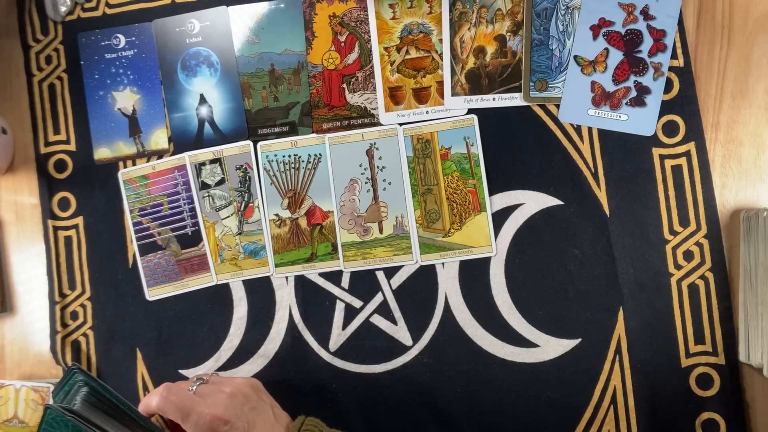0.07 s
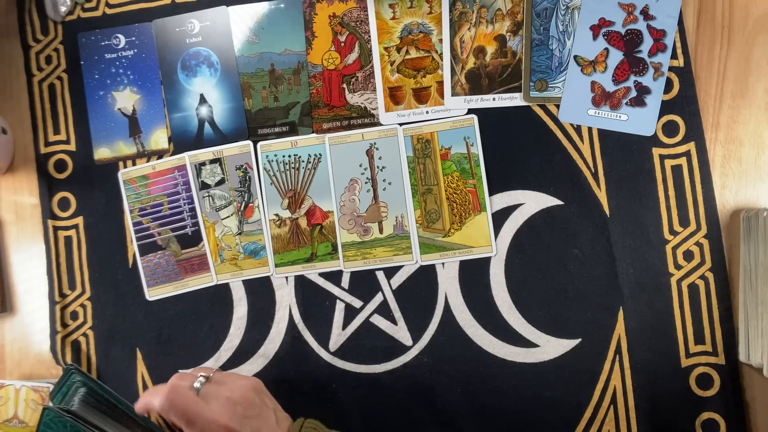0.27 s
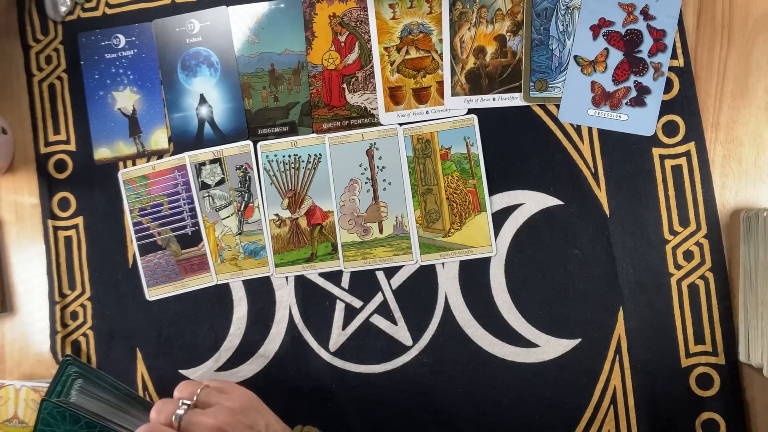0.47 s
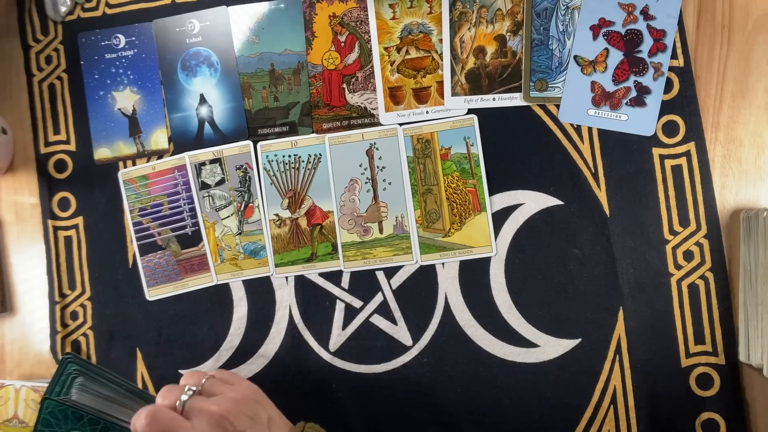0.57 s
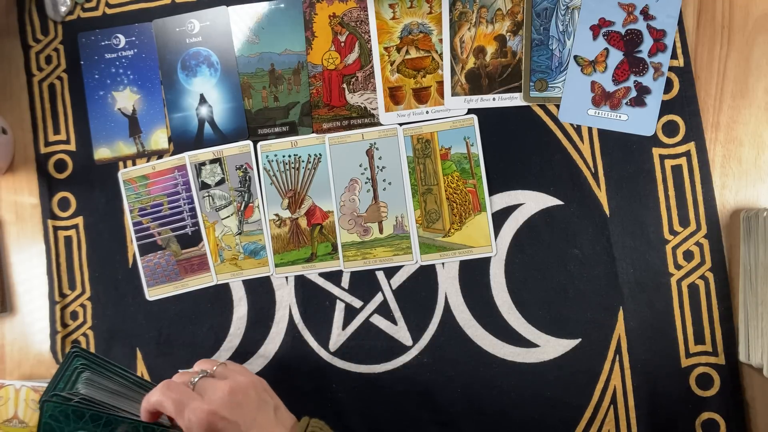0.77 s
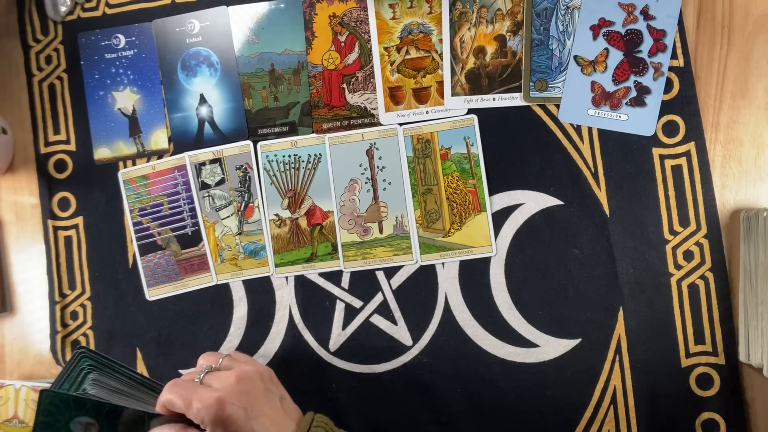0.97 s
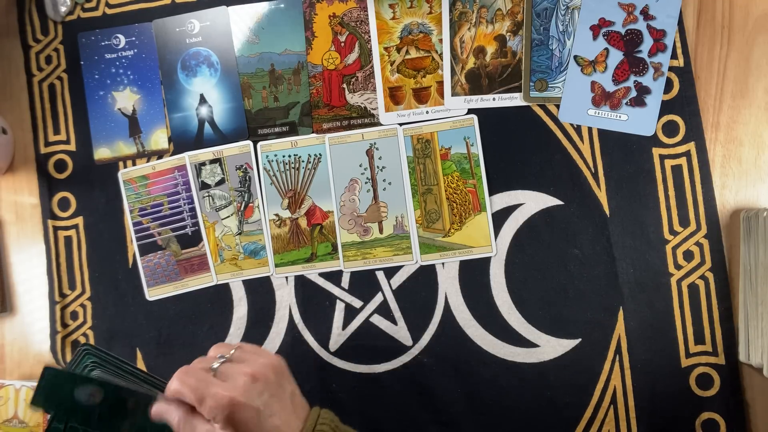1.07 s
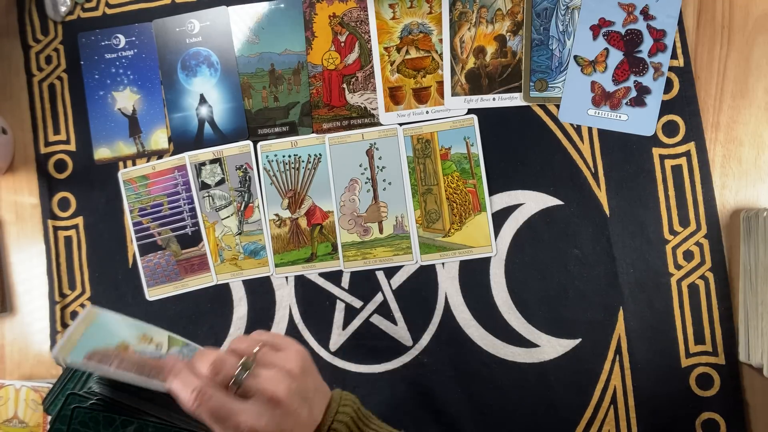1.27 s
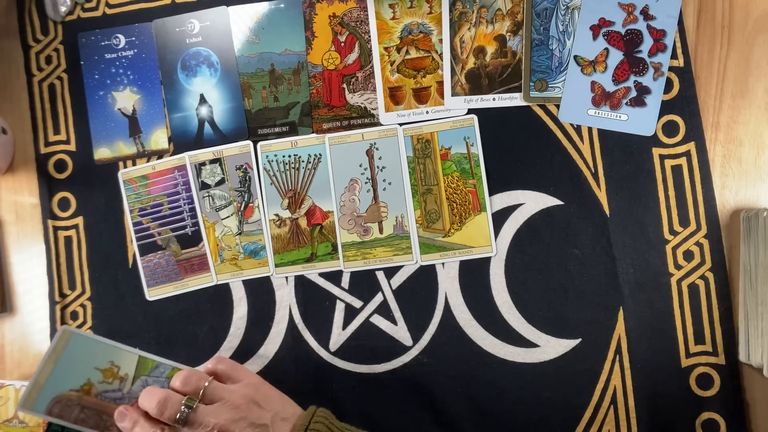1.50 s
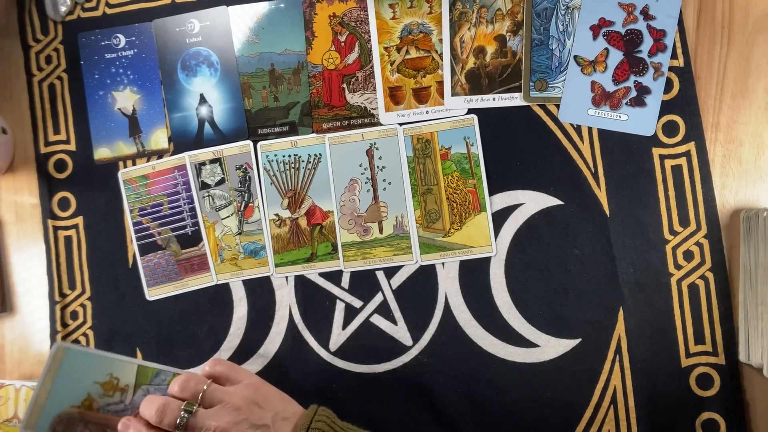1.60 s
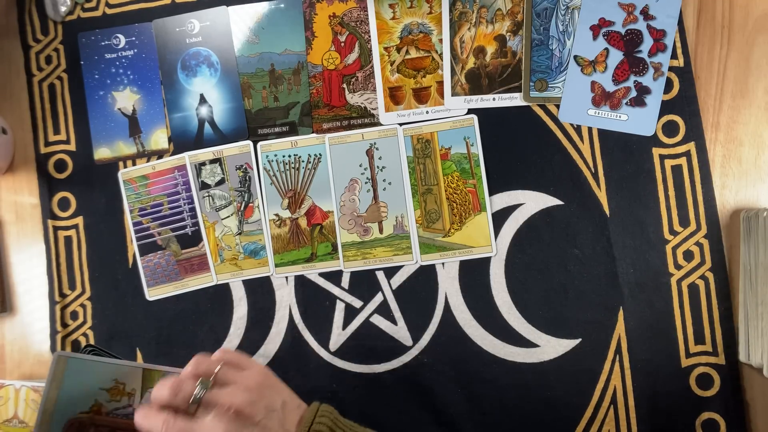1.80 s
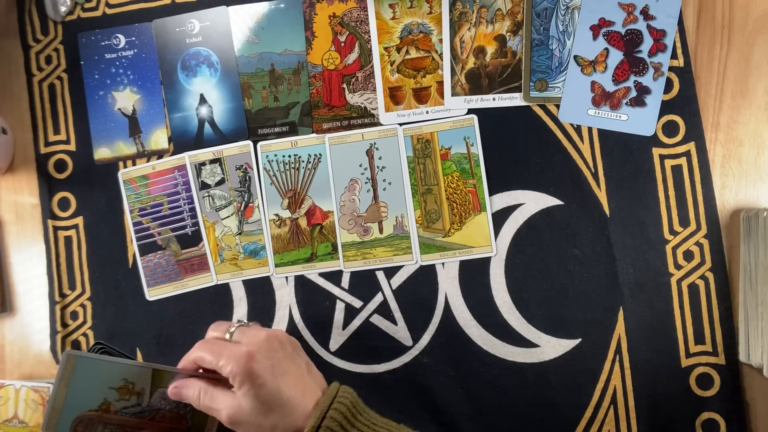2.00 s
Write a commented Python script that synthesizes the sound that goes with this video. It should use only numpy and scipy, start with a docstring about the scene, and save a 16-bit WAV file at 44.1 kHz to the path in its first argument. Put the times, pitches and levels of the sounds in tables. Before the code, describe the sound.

A tarot card is drawn from a hand-held deck. Faint rubbing and tiny ticks fill the first second, then the card slides, catches and comes free with a sharp snap at about 1.15 seconds. Two lighter clicks follow near 1.35 and 1.45 seconds as it is turned over. Card rubs softly on card until about 2 seconds. The small, quiet room rings briefly over a low rumble.

```python
"""Drawing a tarot card

A card slides out of a hand-held deck, catches, and snaps free over a cloth-covered table.
Two lighter clicks follow as it is turned over and a corner flicks past a finger.
Card rubs and ticks softly on card. A small, quiet room rings after each sound over a low rumble."""
import sys
import numpy as np
from scipy import signal
from scipy.fft import rfft, irfft
from scipy.io import wavfile

SR = 44100
rng = np.random.default_rng(int(sys.argv[2]) if len(sys.argv) > 2 else 0)


def generate_wav(sig):
    """Save sig (samples, or channels by samples) to the path in sys.argv[1] as 16-bit PCM at SR."""
    pcm = np.round(np.clip(np.atleast_2d(sig).T, -1, 1) * 32767).astype(np.int16)
    wavfile.write(sys.argv[1], SR, pcm)


N = 90316  # samples, about 2 seconds


def snap():
    """The card whips out, back and out: each blow slaps the air, rings the card and scrapes its edge."""
    # The blows. Each row: start in seconds, then slap, ring and scrape strength in dB.
    hits = [(1.15018, -33.5, -22, -17), (1.15091, -16.5, -40.5, -22), (1.15318, -5, -21.5, -12.5),
            (1.15472, -9, -52, -20), (1.15707, -39.5, -28, -28.5), (1.1627, -15, -39, -34.5)]
    # Tone of a slap. Each row: frequency in Hz, level in dB.
    slap_tone = [(20, -11), (45, -2), (100, -4), (320, -8), (580, -1.5), (1150, -2), (1900, 1),
                 (2400, -37.5), (3100, -11), (6000, -44), (16000, -57)]
    # Notes of the bending card. Each row: pitch in Hz, level in dB, fade time in seconds.
    card_notes = [(563, -9.5, 0.021), (904, -22.5, 0.12), (1174, -6, 0.021), (1697, -5.5, 0.045),
                  (1656, -7, 0.04), (2833, -23.5, 0.022), (3572, -19.5, 0.032), (4140, -29.5, 0.05)]
    # Tone of the edge scraping off the deck. Each row: frequency in Hz, level in dB.
    scrape_tone = [(300, -25), (2400, -11.5), (3400, -0.5), (5000, 5), (8000, -4), (10200, -4),
                   (11500, -15), (16000, -16.5)]
    starts, slap_db, ring_db, scrape_db = np.array(hits).T
    swing = (-1) ** (np.arange(len(starts)) // 2)  # the direction flips every two blows
    slaps = convolve(blows(starts, slap_db, swing), pulse(slap_tone))
    rings = convolve(blows(starts, ring_db, swing), ring(card_notes))
    scrape = sum(undb(db - 22) * decay(start, fade_s=0.0089) for start, db in zip(starts, scrape_db))
    return slaps + rings + burst(scrape, scrape_tone)


def clicks():
    """A corner flicks past a finger: a tick, a short ring that depends on the grip, a soft thud."""
    # Each row: start in seconds, tick level in dB, thud strength in dB.
    flicks = [(1.3485, -26, -19.5), (1.4666, -21.5, -35)]
    # Notes of the held card. Each row: pitch in Hz, fade time in seconds, dB in click one, dB in click two.
    held_notes = [(466, 0.077, -50.5, -58.5), (730, 0.015, -40, -70), (1079, 0.065, -47, -49.5),
                  (1325, .016, -36.5, -39), (1940, 0.015, -61, -36.5), (2736, 0.023, -87, -48.5),
                  (3110, 0.019, -53, -43), (3860, 0.029, -59, -42.5), (4100, 0.024, -54, -48.5),
                  (4660, 0.0092, -41.5, -39.5), (6880, 0.0093, -50.5, -57)]
    # Tone of a dry tick. Each row: frequency in Hz, level in dB.
    tick_tone = [(100, -15), (700, 9.5), (1600, -4), (2400, -8), (3300, 9.5), (5000, 6.5), (7000, 0.5),
                 (9000, -4.5), (13000, -9), (16000, -24)]
    thud = ring([(254, -30, 0.066), (80, -36, 0.05)])
    sound = 0
    for click, (start, tick_db, thud_db) in enumerate(flicks):
        notes = [(hz, levels[click], fade_s) for hz, fade_s, *levels in held_notes]
        card = ring(notes[::2]) - ring(notes[1::2])  # neighbouring notes bend it opposite ways
        tick = convolve(blows([start], tick_db), pulse(tick_tone))
        sound = sound + tick + convolve(blows([start], 0), card + undb(thud_db) * thud)
    return sound


def catches():
    """Card edges catch for a moment and fingertips nudge the deck."""
    # Each row: start in seconds, bright edge level in dB, dull fingertip level in dB.
    snags = [(0.349, -86, -61), (0.357, -72, -72), (0.393, -64, -81), (.484, -70, -65), (.621, -71.5, -67),
             (0.954, -69, -62), (0.963, -70, -64.5), (1.1274, -46, -48), (1.1347, -35, -45.5),
             (1.1395, -38, -37), (1.407, -62, -64), (1.4427, -52.5, -64), (1.881, -60, -60.5),
             (1.893, -58.5, -57.5)]
    # Tones of an edge and of a fingertip. Each row: frequency in Hz, level in dB.
    edge_tone = [(300, -22), (2400, -12.5), (3400, -2), (4400, 2.5), (6000, -10.5), (8000, -5),
                 (11000, -29), (16000, -29)]
    finger_tone = [(60, -1.5), (300, 1), (700, -1.5), (1400, -0.5), (1900, -4.5), (2500, -16.5),
                   (8000, -43), (16000, -58)]
    bright = sum(undb(db) * decay(start, fade_s=0.0097) for start, db, _ in snags)
    dull = sum(undb(db) * decay(start, fade_s=0.03) for start, _, db in snags)
    return burst(bright, edge_tone) + burst(dull, finger_tone)


def rubs():
    """Paper fibres stick and slip in thousands of tiny jolts that hiss and make the deck sound."""
    # Card sliding on card. Each row: peak, rise and fall times in seconds, hiss and deck levels in dB.
    slides = [(.266, 0.011, 0.023, -81.5, -84), (0.388, 0.046, 0.095, -78, -77),
              (0.594, 0.096, 0.077, -86, -85), (.80, 0.085, .08, -84, -82.5),
              (.898, .02, 0.058, -79.5, -70), (1.137, 0.15, 0.03, -62, -70.5), (1.45, 0.12, 0.19, -81, -74),
              (1.632, 0.097, 0.038, -67.5, -81.5), (1.71, 0.069, 0.069, -85, -77.5),
              (1.836, 0.082, 0.071, -72.5, -71), (2.011, 0.17, 0.12, -92.5, -73)]
    # Tones of the paper's hiss and of the deck. Each row: frequency in Hz, level in dB.
    hiss_tone = [(300, -23), (1500, 0), (2400, -3), (3000, 0), (4200, 1), (5500, -2.5), (7500, -4),
                 (10000, -13), (16000, -21)]
    deck_tone = [(100, -9.5), (350, -3.5), (550, 7.5), (800, -3.5), (1500, 3.5), (1900, -5.5), (2400, -22),
                 (16000, -44)]
    slips_per_s, spread_db = 7900, 3
    slips = (rng.random(N) < slips_per_s / SR) * rng.choice([-1, 1], N)
    jolts = slips * undb(spread_db * np.minimum(rng.exponential(size=N), 5))
    hiss = sum(undb(db) * stroke(peak, rise, fall) for peak, rise, fall, db, _ in slides)
    deck = sum(undb(db) * stroke(peak, rise, fall) for peak, rise, fall, _, db in slides)
    return hiss * colour(jolts, hiss_tone) + deck * colour(jolts[::-1], deck_tone)


def bumps():
    """The hand and the deck bump softly: low notes that die quickly."""
    # Each row: start in seconds, pitch in Hz, level in dB, fade time in seconds.
    thumps = [(1.385, 300, -60.5, 0.076), (1.89, 58, -52, 0.076)]
    return sum(ring([note], start) for start, *note in thumps)


def room(sound):
    """Sound bounces off hands, table and a near wall, then rings on, growing duller as it fades."""
    # Bands of the echo, then notes of table and room.
    # Each row: frequency in Hz, level in dB, fade time in seconds.
    echo_bands = [(101, -22, 0.55), (300, -17.5, 0.37), (602, -13.5, 0.34), (1290, -17, 0.38),
                  (2420, -12.5, 0.4), (3990, -13.5, 0.36), (8000, -17.5, 0.25), (15000, -17, 0.25)]
    room_notes = [(387, -57, 0.29), (536, -65.5, 0.27), (904, -72.5, 0.31), (1129, -70.5, 0.39),
                  (1333, -71.5, .2), (1637, -69.5, .3), (1735, -79, 0.29), (1883, -71, 0.12),
                  (3660, -68, 0.28), (4430, -67, .2)]
    # Tone of the bounces off hands and table. Each row: frequency in Hz, level in dB.
    scatter_tone = [(200, 3), (1200, -4), (2400, 1), (4000, -1), (7000, -2), (16000, -6)]
    log_hz = np.log(np.fft.rfftfreq(N, 1 / SR) + 1)
    centres = np.log([row[0] for row in echo_bands])
    white = rfft(rng.standard_normal(N))
    tail = 0
    for share, (_, db, fade_s) in zip(np.eye(len(echo_bands)), echo_bands):
        band = irfft(white * np.interp(log_hz, centres, share), N)
        fade = decay(0.0052, fade_s)
        tail = tail + undb(db) * band * fade / np.linalg.norm(fade)
    scatter = noise(scatter_tone) * decay(0.0013, fade_s=0.051)
    scatter = undb(-13) * scatter / np.linalg.norm(scatter)
    wall = blows(starts=[0.0087], db=-25)
    return sound + convolve(sound, tail + scatter + wall + ring(room_notes))


def room_tone():
    """The room rumbles, hisses faintly and hums; a dull rumble swells now and then."""
    # Tones of the steady rumble and of the swells. Each row: frequency in Hz, level in dB.
    steady_tone = [(12, 2.5), (33, -2), (47, -8), (97, -17), (184, -21.5), (240, -24), (360, -29),
                   (1130, -34), (1700, -39.5), (2300, -44.5), (4500, -47), (7300, -48), (16000, -49)]
    swell_tone = [(40, -26), (115, -10.5), (148, 2), (180, -2), (240, -18), (400, -24.5), (900, -48),
                  (16000, -76)]
    # Low notes of the room. Each row: pitch in Hz, width in Hz, level in dB.
    hum_notes = [(138.6, 24, -85), (183.9, 14, -78), (300, 5.1, -87.5), (412, 10, -96.5)]
    # How the hum rises and falls. Each row: time in seconds, change in dB.
    hum_changes = [(0, -2), (0.699, 4), (1.1, -6.5), (1.6, -4), (2.05, -6.5)]
    # Each row: peak, rise and fall times in seconds, level in dB.
    swells = [(.11, 0.13, 0.1, -68), (0.221, 0.078, .11, -59.5), (0.459, 0.063, 0.072, -64.5),
              (1.42, 0.11, 0.19, -68.5)]
    freqs = np.fft.rfftfreq(N, 1 / SR)
    hum = 0
    for hz, width, db in hum_notes:
        narrow_band = rfft(rng.standard_normal(N)) / (1 + (2 * (freqs - hz) / width) ** 2)
        hum = hum + undb(db) * unit(irfft(narrow_band, N))
    hum *= undb(np.interp(since(0), *np.array(hum_changes).T))
    swelling = sum(undb(db) * stroke(peak, rise, fall) for peak, rise, fall, db in swells)
    return undb(-62.5) * noise(steady_tone) + hum + swelling * noise(swell_tone)


def undb(db):
    """Turn decibels into a multiplier."""
    return 10 ** (np.asarray(db) / 20)


def unit(sound):
    """Scale a sound to an average (rms) level of 1."""
    return sound / np.sqrt(np.mean(sound ** 2))


def convolve(sound, response):
    """Let every sample of a sound set off a copy of the response."""
    return signal.fftconvolve(sound, response)[:N]


def gains(tone, size):
    """A multiplier for each frequency, from rows of Hz and dB."""
    hz, db = np.array(tone, float).T
    log_hz = np.log(np.fft.rfftfreq(size, 1 / SR) + 1)
    return undb(np.interp(log_hz, np.log(hz), db))


def colour(sound, tone):
    """Give a sound this tone, at level 1."""
    return unit(irfft(rfft(sound) * gains(tone, N), N))


def noise(tone):
    """Steady noise with this tone, at level 1."""
    return colour(rng.standard_normal(N), tone)


def pulse(tone, size=2048):
    """The shortest click with this tone, at energy 1."""
    cepstrum = irfft(np.log(gains(tone, size)))
    # Folding onto the first half packs the energy at the start.
    cepstrum[1:size // 2] *= 2
    cepstrum[size // 2 + 1:] = 0
    click = irfft(np.exp(rfft(cepstrum)))
    return click / np.sqrt(np.sum(click ** 2))


def burst(level, tone):
    """Noise that follows a level curve and is then given a tone."""
    return convolve(level * rng.standard_normal(N), pulse(tone))


def since(start):
    """Seconds since the start, zero before it."""
    return np.maximum(np.arange(N) / SR - start, 0)


def decay(start, fade_s):
    """Start suddenly, then drop 60 dB in each fade time."""
    t = since(start)
    return (t > 0) * np.exp(-np.log(1000) * t / fade_s)


def stroke(peak, rise, fall):
    """A rounded swell, 20 dB down at `rise` seconds before its peak and `fall` seconds after."""
    t = np.arange(N) / SR - peak
    return 10 ** -(np.maximum(-t / rise, t / fall) ** 2)


def blows(starts, db, sign=1):
    """A one-sample push or pull at each start time."""
    spikes = np.zeros(N)
    spikes[np.round(np.asarray(starts) * SR).astype(int)] = sign * undb(db)
    return spikes


def ring(notes, start=0):
    """Fading pure notes. Each row: pitch in Hz, level in dB, fade time in seconds."""
    t = since(start)
    return sum(undb(db) * decay(start, fade_s) * np.sin(2 * np.pi * hz * t) for hz, db, fade_s in notes)


def scene():
    """All the card sounds in the room, over its rumble, as one channel."""
    handling = snap() + clicks() + catches() + rubs() + bumps()
    return (room(handling) + room_tone())[None]


def record(dry):
    """Cut the treble above 16000 Hz."""
    return signal.sosfilt(signal.ellip(8, 0.2, 70, 16000, fs=SR, output="sos"), dry)


dry = scene()
out = record(dry)
generate_wav(out)
```